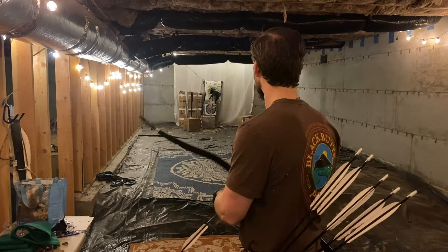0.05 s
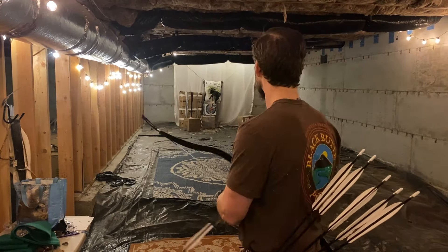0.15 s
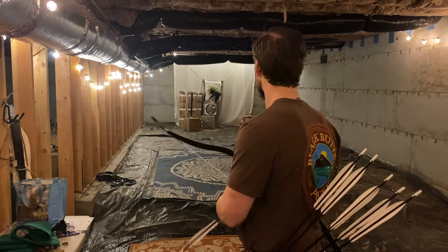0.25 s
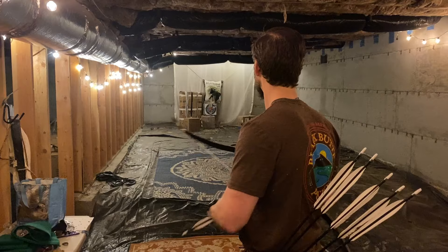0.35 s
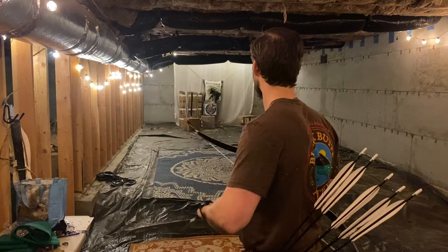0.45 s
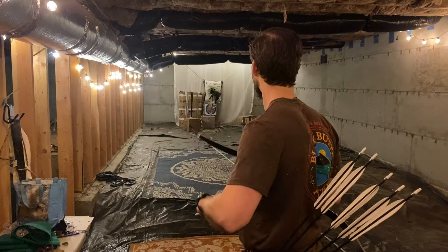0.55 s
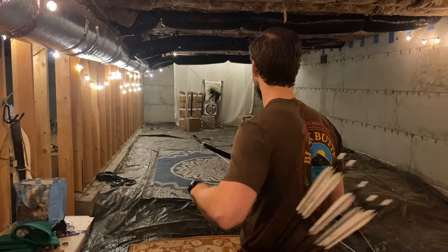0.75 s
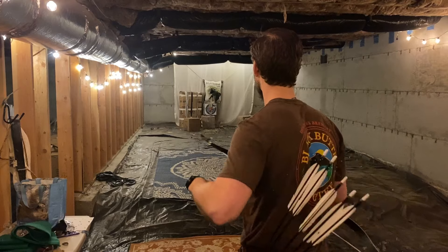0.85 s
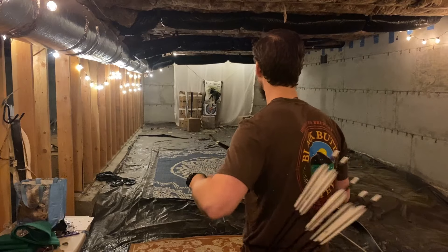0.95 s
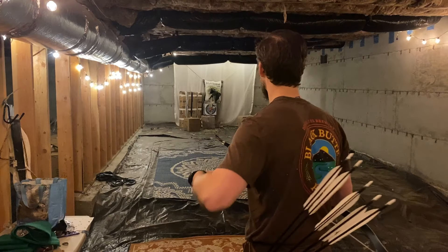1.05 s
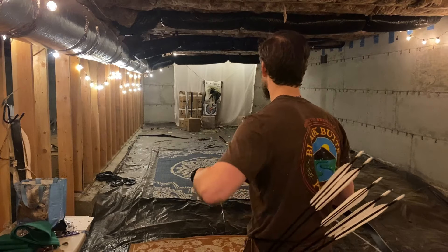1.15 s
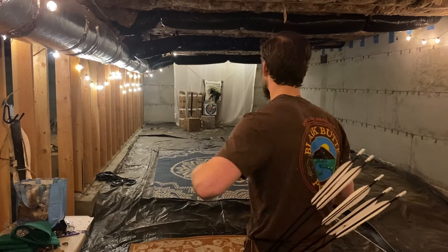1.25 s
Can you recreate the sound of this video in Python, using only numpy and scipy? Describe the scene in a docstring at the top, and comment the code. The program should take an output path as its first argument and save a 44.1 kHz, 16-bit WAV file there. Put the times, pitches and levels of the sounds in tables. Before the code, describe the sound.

An arrow scrapes and clacks out of a quiver, and the other arrows settle.

```python
"""Faint ventilation rumble in a low, quiet cellar range; then, close by, an arrow leaves a hip quiver.
Its feathers hiss and its shaft scrapes past the others, clacks once loudly against them and slides out
with gliding resonances and a last chatter. The remaining arrows knock on the quiver wall and settle,
and a sleeve brushes. A two-port stereo microphone hears it, with early echoes off ceiling and walls."""
import sys
import numpy as np
from scipy import signal
from scipy.fft import rfft, irfft, next_fast_len
from scipy.io import wavfile
from scipy.ndimage import map_coordinates

SR = 44100
rng = np.random.default_rng(int(sys.argv[2]) if len(sys.argv) > 2 else 0)


def wav_out(sig):
    """Save sig, one row per channel (or a flat mono array), as 16-bit PCM at SR to the path in sys.argv[1]."""
    wavfile.write(sys.argv[1], SR, np.round(np.clip(np.atleast_2d(sig).T, -1, 1) * 32767).astype(np.int16))


N = 57330

# Ventilation. Each row: time in seconds, level in dB. Levels in all tables are relative.
RUMBLE_LEVEL = [(0, -80.5), (0.13, -75.5), (0.73, -75.5), (0.85, -76.5), (1.3, -75.5)]
# Its spectrum, and the further shaping of its stereo side. Each row: frequency in Hz, level in dB.
RUMBLE_SPECTRUM = [(20, -16.5), (40, -8.5), (58, -1), (85, -7.5), (150, -12), (300, -16.5), (1000, -24.5),
                   (4000, -32), (16000, -37.5)]
RUMBLE_SIDE = [(20, -14), (60, -13), (130, -9), (1000, 0.5), (8000, -12)]

# Feather hiss, shaft scrape, first pull, long draw and chatter. Each row: time in seconds, level in dB.
FEATHER_LEVEL = [(0.122, -100), (0.129, -52.5), (0.16, -73), (0.205, -77), (0.25, -52), (0.31, -56),
                 (0.335, -62), (0.365, -46), (0.42, -51.5), (0.49, -53), (0.56, -80), (0.65, -70),
                 (0.78, -64), (0.885, -68), (0.94, -83.5), (1.09, -76), (1.28, -103)]
SCRAPE_LEVEL = [(0.125, -100), (0.135, -52.5), (0.17, -73), (0.19, -50), (0.208, -55.5), (0.232, -51),
                (0.305, -53.5), (0.334, -66), (0.385, -50.5), (0.455, -55.5), (0.485, -43), (0.52, -57),
                (0.57, -63.5), (0.645, -59.5), (0.67, -60.5), (0.765, -63), (0.80, -57.5), (0.87, -61),
                (0.91, -68), (1.0, -78.5), (1.2, -77.5), (1.28, -88)]
PULL_LEVEL = [(0.15, -90), (0.172, -58), (0.19, -50.5), (0.206, -52.5), (0.228, -47), (0.275, -49.5),
              (0.3, -47), (0.318, -53), (0.335, -66), (0.38, -110)]
DRAW_LEVEL = [(0.4, -110), (0.455, -51), (0.492, -45.5), (0.565, -57.5), (0.607, -49.5), (0.615, -42.5),
              (0.625, -53), (0.636, -45), (0.649, -45), (0.66, -52.5), (0.687, -51.5), (0.70, -50.5),
              (0.757, -47), (0.775, -55.5), (0.86, -72), (0.95, -88)]
CHATTER_LEVEL = [(0.66, -110), (0.688, -61.5), (0.697, -48.5), (0.715, -54), (0.76, -60.5), (0.785, -100)]
# The tone colour of each close sound. Each row: frequency in Hz, level in dB.
FEATHER_SPECTRUM = [(1000, -38), (4000, 4.5), (7000, 4.5), (11000, 1), (16000, -4.5)]
SCRAPE_SPECTRUM = [(200, -43), (600, -27), (1000, -12), (1700, 3.5), (2500, 6.5), (4300, 0), (6500, 0),
                   (8000, -11), (16000, -20.5)]
CRACK_SPECTRUM = [(100, -67), (300, -16.5), (600, -7), (950, -8), (1500, -5), (2500, 2), (4000, 3),
                  (6300, -2), (8000, -19), (11000, -11), (16000, -32.5)]
CHATTER_SPECTRUM = [(600, -27.5), (1000, -18.5), (1350, -1), (1800, 0.5), (2150, -7), (2560, 3),
                    (2950, -12), (3350, -4), (5000, -22), (12000, -46.5)]
THUD_SPECTRUM = [(20, -27), (45, 4), (62, 10), (100, -7), (200, -19.5), (600, -61)]
CLOTH_SPECTRUM = [(100, -26), (600, 5), (1200, 3.5), (2800, 6), (7000, 5), (11000, 0.5), (16000, -11)]
# Bending resonances of the shaft, first pulled, then sliding free. Each row: frequency in Hz,
# width in Hz, level in dB, time of strongest drive in seconds, glide in Hz per second.
PULL_MODES = [(1132, 100, -16, 0.3, 3800), (1509, 60, -7, 0.228, 5500), (2338, 6.7, -3, 0.23, 650),
              (2600, 23, -5, 0.24, 6200), (3346, 52, -4, 0.21, 7000), (3580, 140, -8, 0.27, 840),
              (4080, 52, -3, .22, 4000), (5090, 99, -9.5, 0.27, 1000)]
DRAW_MODES = [(902, 59, -7.5, 0.518, 304), (1463, 36, -4, 0.536, -700), (2012, 70, 1, 0.64, -1400),
              (2590, 110, -1.5, 0.681, -1600), (3290, 100, -6.5, 0.69, -1700), (4010, 310, -1, 0.41, 0),
              (6200, 57, -15, 0.647, -3.5)]
# Ring of the arrows, the quiver wall and the air inside it.
# Each row: frequency in Hz, level in dB, time to fall 60 dB in seconds.
ARROW_MODES = [(405.7, -46, 0.074), (726.6, -40, 0.057), (1121, -29.5, 0.045), (1193, -29.5, 0.073),
               (1767, -24.5, 0.055), (2250, -36, 0.063), (2375, -21.5, 0.035), (3010, -30.5, 0.047),
               (3574, -37, 0.063), (4015, -33.5, 0.067), (4180, -31.5, 0.055), (4600, -41, 0.046),
               (5760, -31.5, 0.065), (6835, -39.5, 0.07)]
WALL_MODES = [(1706, -9, 0.023), (2254, 3.5, 0.011), (2520, -2, .012), (4480, -7, 0.011)]
HOLLOW_MODES = [(598, -22.5, 0.059), (1133, -8.5, 0.024)]

# Shaft against shaft. Each row: start in seconds, level in dB, ring in dB, treble cutoff in Hz.
CLACKS = [(0.1272, -20, -11, 2270), (0.3523, -5, 1, 10870), (0.3567, -15.5, -14, 7960),
          (0.437, -28, 0.5, 6500), (0.467, -28, -7, 8000), (0.682, -36, -1, 6000), (0.7895, -31.5, 1, 6800),
          (0.7937, -43, -10, 6900), (0.888, -39.5, -7, 7050), (1.0186, -54, -6, 4500),
          (1.0913, -44.5, -13, 6960)]
# Neighbouring arrows rubbing. Each row: peak time in seconds, level in dB, half length in seconds,
# band centre in Hz, half width in octaves.
RUBS = [(0.13, -48.5, 0.0016, 1540, 0.059), (0.756, -52, 0.0063, 3930, .06),
        (0.811, -48, 0.0055, 5330, 0.32), (0.809, -54, 0.0041, 3270, 0.083),
        (1.193, -67.5, 0.0072, 4200, 0.61)]
# Arrows on the quiver wall. Each row: start in seconds, level in dB, hollow ring in dB.
KNOCKS = [(0.7895, -46.5, -6.5), (0.828, -52.5, 2), (0.8479, -40.5, -4), (0.8522, -46, -1),
          (0.8905, -54.5, -12), (1.0216, -55, -25), (1.0750, -61.5, -11)]
# Weight shifts and sleeve brushes. Each row: peak time in seconds, level in dB, half length in seconds.
WEIGHT_SHIFTS = [(0.812, -74, 0.025), (0.992, -72.5, 0.036)]
BRUSHES = [(1.143, -61.5, 0.013)]
# Soft handling knocks. Each row: start in seconds, level in dB, pitch in Hz, cloth scuff in dB.
BUMPS = [(0.853, -67.5, 586, -33), (0.938, -69.5, 206, -31), (1.2883, -58, 307, -11)]

# Ceiling and walls, heard from the microphone. Each row: delay in seconds, level in dB.
ECHOES = [(.0042, -22), (.0052, -21.5), (.0095, -25), (0.0123, -13.5), (0.0151, -23.5)]
# Phase between the microphone ports. Each row: frequency in Hz, lead of the left in radians.
PORT_PHASE = [(0, 0.18), (1000, 0.51), (3300, 0.57), (6200, 1), (7200, 0)]
# Balance of the ports. Each row: frequency in Hz, left minus right in dB.
PORT_BALANCE = [(100, 0.3), (700, 1.5), (2200, 0.5), (4400, 3), (8000, -0.5), (15000, 0.2)]

SLIPS_PER_S, SLIP_SPREAD_DB = 3500, 3.5
JUDDER_PER_S, JUDDER_DB = 110, 3


def amp(db):
    """Decibels to gain."""
    return 10 ** (np.asarray(db) / 20)


def unit(x):
    """Scale to rms 1."""
    return x / np.sqrt(np.mean(x ** 2) + 1e-20)


def along(points, hz):
    """Read (Hz, value) points on a log frequency axis."""
    f, v = np.transpose(points)
    return np.interp(np.log(hz + 1), np.log(f + 1), v)


def clock():
    """Seconds at every sample."""
    return np.arange(N) / SR


def envelope(levels):
    """Gain at every sample from (seconds, dB) points."""
    return amp(np.interp(clock(), *np.transpose(levels)))


def wobble(knots_per_s):
    """A smooth random curve."""
    return map_coordinates(rng.standard_normal(2048), [clock() * knots_per_s], mode="wrap")


def filtered(x, response):
    """x through a complex frequency response."""
    size = next_fast_len(N + SR // 2)
    return irfft(rfft(x, size) * response(np.fft.rfftfreq(size, 1 / SR)), size)[..., :N]


def coloured(x, spectrum):
    """x shaped by a spectrum, at rms 1."""
    return unit(filtered(x, lambda hz: amp(along(spectrum, hz))))


def low_cut(x, hz):
    """Steep high-pass."""
    return signal.sosfilt(signal.butter(4, hz, "high", fs=SR, output="sos"), x)


def high_cut(x, hz):
    """Gentle low-pass."""
    return signal.lfilter(*signal.butter(2, hz, fs=SR), x)


def snap(spectrum, size=2048):
    """A minimum-phase pulse of energy 1 with the given spectrum."""
    cepstrum = irfft(np.log(amp(along(spectrum, np.fft.rfftfreq(size, 1 / SR)))))
    causal = np.r_[1, np.full(size // 2 - 1, 2), np.zeros(size // 2)]
    pulse = irfft(np.exp(rfft(cepstrum * causal)))
    return pulse / np.linalg.norm(pulse)


def fade(t60):
    """Decay of 60 dB in t60 seconds."""
    return np.exp(-np.log(1000) * clock() / t60)


def burst(t60):
    """Dying noise of energy 1."""
    noise = rng.standard_normal(N) * fade(t60)
    return noise / np.linalg.norm(noise)


def delayed(x, s):
    """x starting at s seconds."""
    return np.pad(x, (max(round(s * SR), 0), 0))[:N]


def swell(s, half_s):
    """A bell-shaped envelope peaking at s seconds."""
    return np.exp(-.5 * ((clock() - s) / half_s) ** 2)


def ringing(modes):
    """Damped sines at random phases."""
    return sum(amp(db) * fade(t60) * np.sin(2 * np.pi * (hz * clock() + rng.random()))
               for hz, db, t60 in modes)


def friction():
    """Tiny slips of uneven size, bunched by judder."""
    slips = (rng.random(N) < SLIPS_PER_S / SR) * rng.choice([-1, 1], N)
    sizes = amp(SLIP_SPREAD_DB * rng.standard_normal(N).clip(-2, 2))
    return unit(slips * sizes * amp(JUDDER_DB * wobble(JUDDER_PER_S)))


def ventilation():
    """Room tone: the ventilation rumbles, nearly mono in the bass."""
    mid, side = coloured(rng.standard_normal((2, N)), RUMBLE_SPECTRUM)
    side = filtered(side, lambda hz: amp(along(RUMBLE_SIDE, hz)))
    return envelope(RUMBLE_LEVEL) * np.array([mid + side, mid - side])


def feathers():
    """The vanes hiss against each other."""
    return envelope(FEATHER_LEVEL) * coloured(friction() + rng.standard_normal(N), FEATHER_SPECTRUM)


def scrape():
    """Broad friction noise of the shaft sliding past the others."""
    return envelope(SCRAPE_LEVEL) * coloured(friction(), SCRAPE_SPECTRUM)


def clacks(buzz_db=-1, buzz_t60_s=0.032):
    """Each contact is a sharp crack, a dense buzz of the bundle and the ring of the shafts."""
    out, crack = np.zeros(N), snap(CRACK_SPECTRUM)
    for s, db, ring_db, cutoff_hz in CLACKS:
        contact = signal.unit_impulse(N) + amp(buzz_db) * burst(buzz_t60_s)
        hit = signal.fftconvolve(contact, crack)[:N] + amp(ring_db) * ringing(ARROW_MODES)
        out += amp(db) * delayed(high_cut(-hit, cutoff_hz), s)
    return low_cut(out, hz=380)  # thin shafts radiate no bass


def rubs():
    """Neighbouring arrows rub briefly, each time in one band of friction noise."""
    out = np.zeros(N)
    for s, db, half_s, centre_hz, octaves in RUBS:
        band = filtered(friction(), lambda hz: 1 / (1 + (np.log2((hz + 1) / centre_hz) / octaves) ** 2))
        bell = swell(s, half_s)
        rub = unit(bell * band) * np.sqrt(np.mean(bell ** 2))  # about rms 1 at its top
        out += amp(db) * rub
    return out


def stroke(levels, modes, waver=0.0066, waver_per_s=35, reach_s=0.082, lock=.5):
    """Friction drives bending resonances; each glides, swells and fades as the contact moves along."""
    slips, song = friction(), np.zeros(N)
    for hz, width_hz, db, best_s, glide_hz_per_s in modes:
        pitch = hz + glide_hz_per_s * (clock() - best_s)
        pitch *= 1 + waver * wobble(waver_per_s)  # wanders as the contact shifts
        carrier = np.exp(2j * np.pi * np.cumsum(pitch) / SR)
        swing = signal.lfilter([1], [1, -np.exp(-np.pi * width_hz / SR)], slips / carrier)
        # Stick-slip steadies the swing: lock 0 rings freely, 1 is an even squeak.
        ring = (carrier * swing / (abs(swing) + 1e-9) ** lock).real
        song += amp(db) * swell(best_s, reach_s) * unit(ring)
    return amp(-4.5) * envelope(levels) * low_cut(song, hz=900)


def chatter(skips_per_s=130, scatter=.25, t60_s=0.024):
    """The end of the shaft skips unevenly over its neighbours; each skip is a short dying rasp."""
    skips = np.cumsum(skips_per_s * np.exp(scatter * wobble(skips_per_s))) / SR
    since_skip_s = (skips % 1) / skips_per_s
    rasp = rng.standard_normal(N) * np.exp(-np.log(1000) * since_skip_s / t60_s)
    return envelope(CHATTER_LEVEL) * unit(signal.fftconvolve(rasp, snap(CHATTER_SPECTRUM))[:N])


def knocks(rise_s=0.00028, click_db=8.5):
    """Arrows fall back against the quiver wall, which clicks and rings hollow."""
    out, rise = np.zeros(N), 1 - np.exp(-clock() / rise_s)
    click = amp(click_db) * np.pad(snap(CRACK_SPECTRUM), (0, N))[:N]
    for s, db, hollow_db in KNOCKS:
        ring = ringing(WALL_MODES) + amp(hollow_db) * ringing(HOLLOW_MODES)
        out += amp(db) * delayed(click + rise * ring, s)
    return out


def weight_shifts():
    """Low thuds of the archer's body shifting its weight."""
    swells = sum(amp(db) * swell(s, half_s) for s, db, half_s in WEIGHT_SHIFTS)
    return swells * coloured(rng.standard_normal(N), THUD_SPECTRUM)


def handling_bumps(t60_s=0.11, q=3.4):
    """Soft handling knocks: a damped low resonance with a scuff of cloth."""
    out = np.zeros(N)
    for s, db, hz, scuff_db in BUMPS:
        thud = filtered(rng.standard_normal(N), lambda f: f * hz / (q * (hz * hz - f * f) + 1j * f * hz))
        scuff = amp(scuff_db) * coloured(friction(), CLOTH_SPECTRUM)
        out += amp(db) * delayed(fade(t60_s) * (unit(thud) + scuff), s)
    return out


def sleeve():
    """A sleeve brushes by in a short swell of cloth friction."""
    return sum(amp(db) * swell(s, half_s) * coloured(friction(), CLOTH_SPECTRUM)
               for s, db, half_s in BRUSHES)


def cellar(x, t60_s=.17, tail_db=-11, side_db=-13.5):
    """The low ceiling and walls return close echoes and a short tail, wide only below the treble."""
    direct = signal.unit_impulse(N)
    echoes = sum(amp(db) * delayed(direct, s) for s, db in ECHOES)
    mid = direct + echoes + amp(tail_db) * delayed(burst(t60_s), s=.003)
    side = amp(side_db) * delayed(high_cut(burst(t60_s), hz=7000), s=.002)
    return signal.fftconvolve(x[None], np.array([mid + side, mid - side]), axes=1)[:, :N]


def scene():
    """The quiver close by in the cellar, over room tone and low thuds."""
    impacts = clacks() + knocks()
    shaft = scrape() + stroke(PULL_LEVEL, PULL_MODES) + stroke(DRAW_LEVEL, DRAW_MODES) + chatter()
    rustle = feathers() + rubs() + sleeve() + handling_bumps()
    return amp(-1) * cellar(impacts + shaft + rustle) + ventilation() + weight_shifts()


def record(dry, split_hz=7200, treble_lag_s=.000245, top_hz=15850):
    """Two microphone ports: left leads in the midrange and lags in the treble; top_hz ends the band."""
    def ports(hz):
        lead = np.interp(hz, *np.transpose(PORT_PHASE))
        lag = 2 * np.pi * treble_lag_s * np.maximum(hz - split_hz, 0)
        share = np.array([[.5], [-.5]])  # left, right
        return np.exp(1j * share * (lead - lag)) * amp(share * along(PORT_BALANCE, hz)) * (hz < top_hz)
    return filtered(dry, ports)


dry = scene()
out = record(dry)
wav_out(out)
```